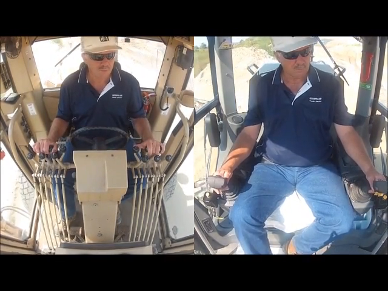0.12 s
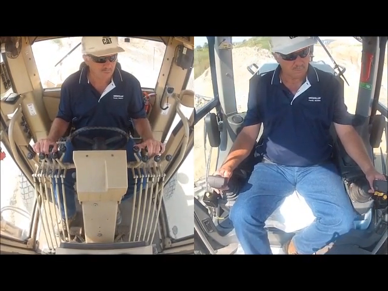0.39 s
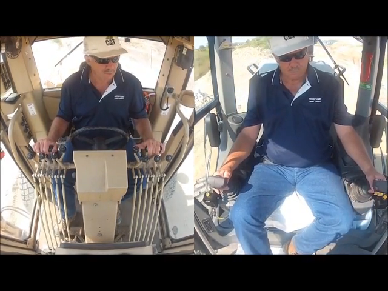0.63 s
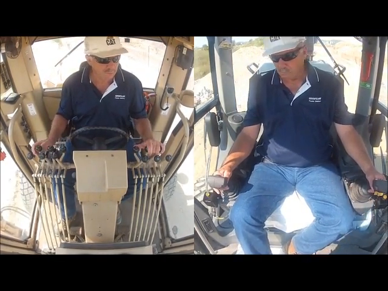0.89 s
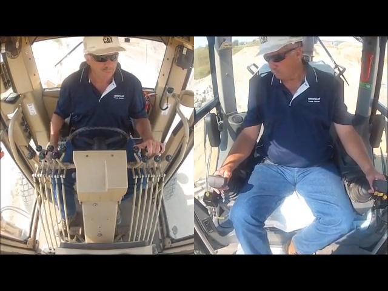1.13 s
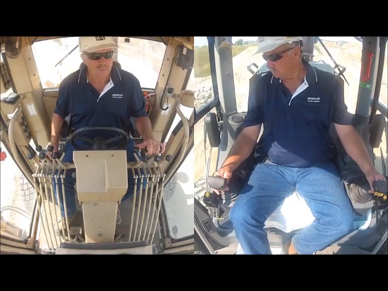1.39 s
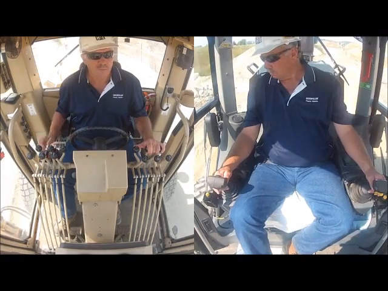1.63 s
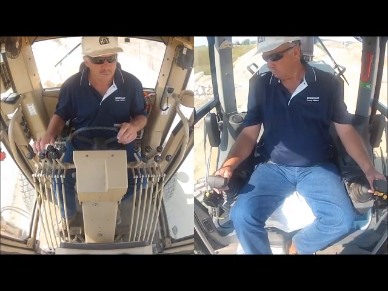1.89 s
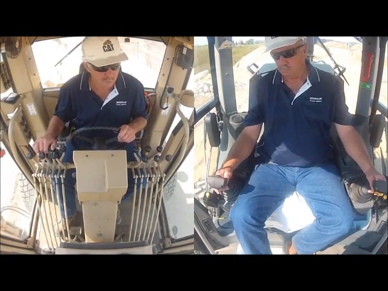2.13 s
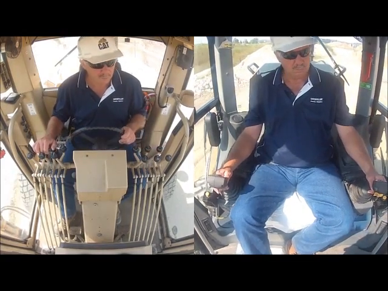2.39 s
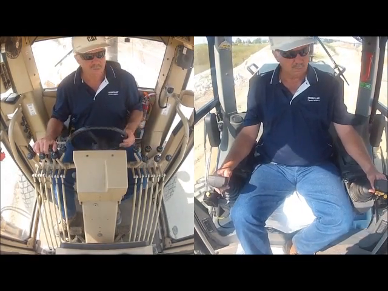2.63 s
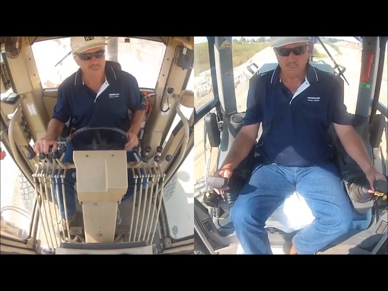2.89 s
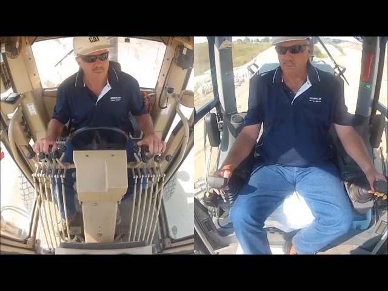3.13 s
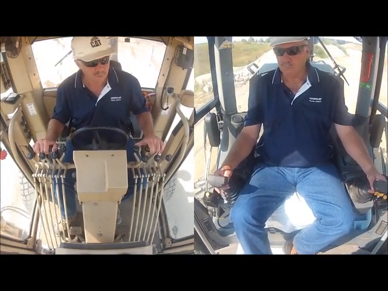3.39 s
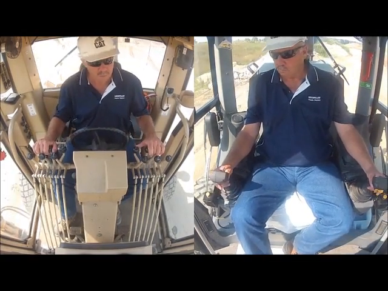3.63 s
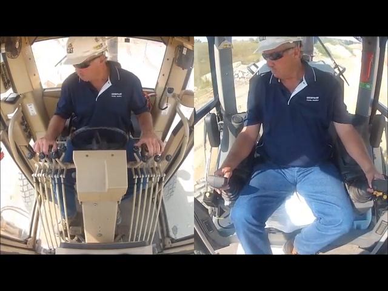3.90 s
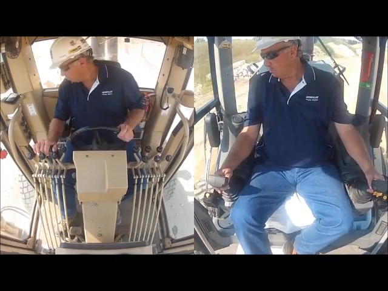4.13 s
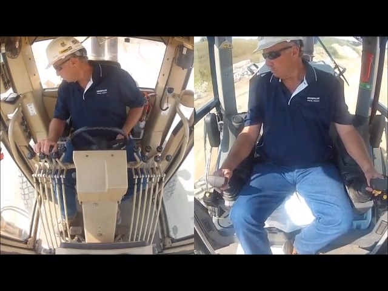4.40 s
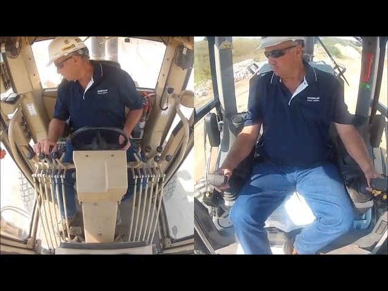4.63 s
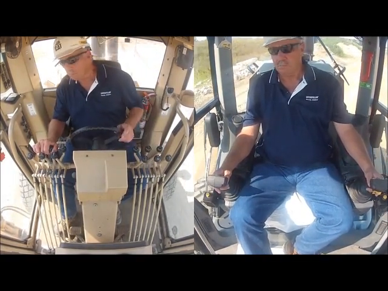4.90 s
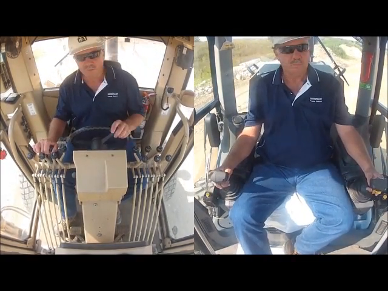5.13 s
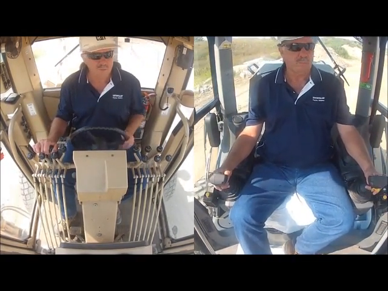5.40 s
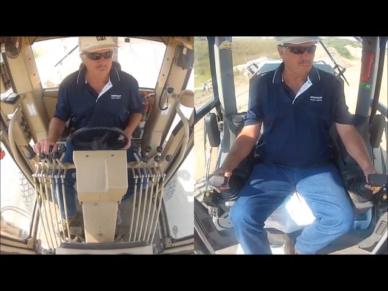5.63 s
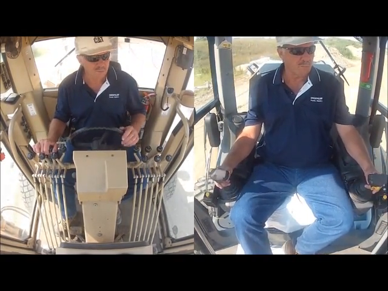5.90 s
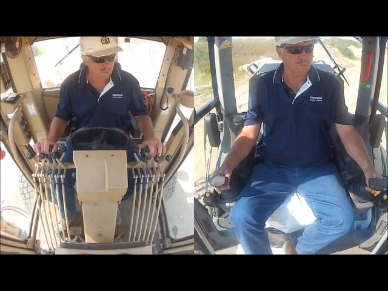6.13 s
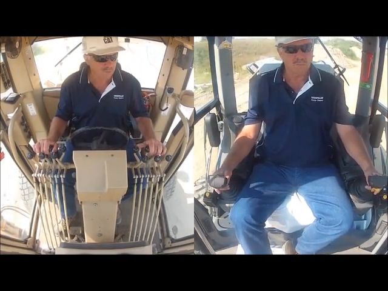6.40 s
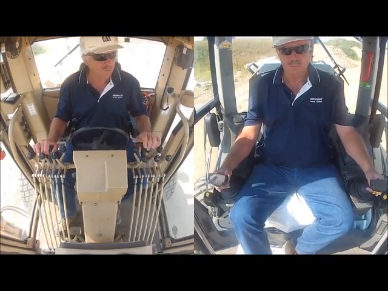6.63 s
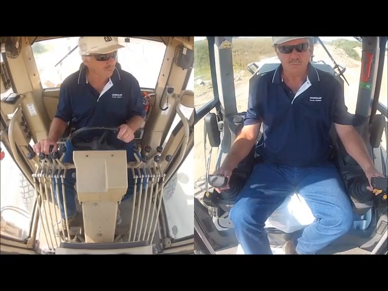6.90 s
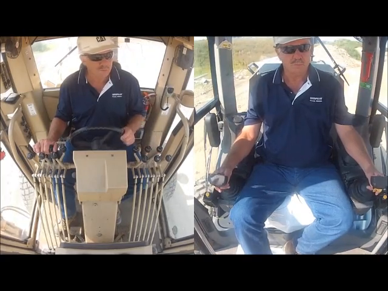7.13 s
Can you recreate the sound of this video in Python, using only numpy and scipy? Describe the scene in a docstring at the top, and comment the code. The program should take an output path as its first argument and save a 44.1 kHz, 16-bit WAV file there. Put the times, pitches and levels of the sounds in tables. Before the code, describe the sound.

Two heavy diesel engines drone low and throb against each other inside machine cabs, with rumble, faint hydraulic whine, bumps and one sharp lever click.

```python
"""Two six-cylinder diesels throb throughout, close enough in speed to beat; the right one sags under load and recovers.
Sines follow their firing and crank orders, and noise stirred by the left engine's firing makes the clatter.
A piston pump on the right engine hums and whines with pressure. The cab booms, thuds, rumbles and jolts over
rough ground; clicks and rattles ring as decaying modes over a restless gear-mesh band. It is all in mono.
A slow sample-and-hold recorder mirrors the mix into the treble."""
import sys
import numpy as np
from scipy import signal
from scipy.fft import rfft, irfft, next_fast_len
from scipy.io import wavfile
from scipy.ndimage import map_coordinates

SR = 44100
rng = np.random.default_rng(int(sys.argv[2]) if len(sys.argv) > 2 else 0)


def gain_from_decibels(decibels):
    """Convert decibel values to linear amplitude factors."""
    exponent = np.asarray(decibels, float) / 20
    return 10 ** exponent


def digitize_waveform(pressure):
    """Quantize a signal to 16-bit integers and store it at the path in sys.argv[1].

    Rows of a 2-D input are taken as channels; values are limited to [-1, 1].
    """
    field = np.atleast_2d(pressure).T
    bounded = np.clip(field, -1, 1)
    quanta = np.round(bounded * 32767).astype(np.int16)
    wavfile.write(sys.argv[1], SR, quanta)


N = 320607

# left engine's firing rate: t/s, f/Hz
LEFT_FIRING = [(0, 108.2), (.6, 107.99), (1.5, 106.98), (2.3, 108.49), (2.8, 107.36), (3.45, 108.05),
               (4.2, 106.75), (4.6, 107.52), (5.1, 106.92), (5.8, 107.63), (6.8, 107.99), (7.27, 107.71)]
# right engine's firing rate and firing tone: t/s, f/Hz, level/dB
RIGHT_FIRING = [(0.0, 111.74, -20.7), (0.6, 111.2, -21.8), (1.45, 111.23, -19.5), (1.7, 108.58, -34.8),
                (2.1, 108.53, -19.4), (2.5, 100.69, -27.6), (2.65, 101.54, -26.9), (2.9, 111.72, -22.2),
                (3.0, 111.93, -22.4), (3.45, 109.41, -20.5), (3.9, 111.44, -19.1), (4.25, 111.48, -20.5),
                (4.55, 112.1, -24.0), (5.2, 111.46, -24.2), (6.4, 111.09, -21.1), (7.0, 111.38, -24.1),
                (7.27, 111.22, -24.3)]
# other crank-locked lines of each engine, before wavering: cycles in two crank turns, level/dB
LEFT_ORDERS = [(7, -40), (9, -34.5), (10, -37.5), (11, -35), (12, -31), (14, -37.5), (15, -42.5), (16, -50),
               (19, -42), (30, -45.5), (34, -43.5)]
RIGHT_ORDERS = [(10, -35), (14, -42.5), (16, -43), (20, -40.5), (27, -47), (29, -43), (32, -45.5),
                (37, -51.5), (39, -43.5), (40, -46), (42, -49.5), (52, -57)]
# where each engine starts in its firing cycle: left/cycles, right/cycles
START_CYCLES = (.071, .734)
# hum of a pump with nine pistons a crank turn: cycles in two crank turns, relative level/dB
PUMP_HUM = [(18, 0), (36, 0)]
# its whine: cycles in two crank turns, relative level/dB, growth/(dB per pressure dB)
PUMP_WHINE = [(54, 12, .5), (72, -4.5, 1), (108, -9, 1)]
# hydraulic valves held open: t/s, length/s, pressure over idle/dB
VALVE_STROKES = [(1.2, 0.22, 2), (2.45, 0.35, 15), (2.82, 0.27, 14.5), (3.517, 0.19, 19), (3.9, 0.23, 16.5),
                 (4.5, 0.31, 13.5), (4.99, .3, 14.5), (5.405, 0.29, 14)]
# spells when the pump hum eases off: t/s, length/s
PUMP_UNLOADED = [(1.58, .85), (2.85, .65), (4.22, 0.21)]
# colour of the combustion clatter: f/Hz, relative level/dB per Hz
CLATTER_COLOUR = [(700, -2), (1100, 5), (1520, -20), (1660, 7.5), (1900, 1), (2200, 5), (2350, -0.5),
                  (2900, 5.5), (3150, 1), (4100, -4)]
# roughness of the ground: t/s, level/dB
GROUND_ROUGHNESS = [(0, 0), (.6, 0), (1.9, 0), (2.4, 1), (2.65, 5), (2.9, 0.5), (3.9, 2), (4.3, 2.5),
                    (4.9, 1.5), (5.2, 2), (5.5, 1.5), (6.0, 1.5), (6.5, 0), (7.27, -3)]
# cab air resonance set going, before wavering: t/s, length/s, f/Hz, level/dB
BOOM_SWELLS = [(-.1, 0.29, 30.8, -20.5), (0.705, .35, 32.98, -19.5), (1.72, 0.39, 32.92, -26),
               (2.22, .12, 33, -20), (2.55, .45, 31.36, -29), (3.77, 1.38, 31.6, -18),
               (5.5, .42, 32.9, -19), (6.05, .3, 32.88, -23)]
# colours of the thuds and the broad rumble: f/Hz, relative level/dB per Hz
THUD_COLOUR = [(12, -40), (18, -2), (24, 11), (34, -4.5), (41, 0), (50, 8), (62, 2.5), (75, -7), (92, -2.5),
               (110, -34)]
RUMBLE_COLOUR = [(85, -6.5), (100, -3.5), (125, 2), (155, -9), (230, -13), (400, -19), (640, -20.5),
                 (710, -21.5), (770, -22), (1000, -31), (1200, -41.5), (1500, -62)]
# bumps in the ground: t/s, level/dB, length of a 20 dB fade/s
JOLTS = [(1.379, -24, 0.095), (2.487, -19, 0.15), (2.692, -20.5, 0.047), (3.032, -24, 0.11),
         (3.384, -25, .08), (3.815, -25, .12), (4.016, -26, .08), (4.249, -25, 0.073), (5.139, -11, 0.045),
         (5.204, -21, 0.041), (5.69, -33, 0.068), (6.062, -22.5, 0.077), (6.184, -24, 0.047),
         (6.6, -25, .08)]
# colour of a jolt's noise: f/Hz, relative level/dB per Hz
FRAME_COLOUR = [(50, -13), (100, -15), (125, -13), (155, -13), (220, -2.5), (450, -8), (900, -22),
                (1500, -45)]
# tones in a jolt: f/Hz, level against its noise/dB
FRAME_MODES = [(123, 3.5), (200, -6), (400, -10.5)]
# lever clicks and rattles: t/s, relative level/dB, ring f/Hz, ring width/Hz, length of a 20 dB fade/s
RATTLES = [(0.931, -34, 1290, 700, .02), (1.293, -29, 2190, 300, 0.041), (1.436, -38, 1298, 700, .02),
           (1.523, -16, 2850, 725, 0.027), (2.482, -35, 2250, 700, .027), (2.686, -35, 1706, 1200, 0.022),
           (2.718, -31, 2300, 1200, 0.021), (3.408, -38, 2095, 500, .02), (3.505, -37, 2900, 1200, 0.048),
           (3.62, -32.5, 3100, 1400, 0.072), (3.65, -41, 3530, 1400, .04),
           (4.067, -29.5, 3292, 2200, 0.029), (4.089, -30.5, 3520, 1500, .028),
           (4.182, -32, 3060, 2200, 0.022), (4.258, -40, 1498, 700, .017), (4.506, -37, 1400, 600, .02),
           (4.68, -40, 1324, 600, .021), (5.147, -38, 1300, 900, .026), (5.817, -34.5, 3195, 2200, 0.03),
           (6.18, -31, 1190, 1000, 0.023)]
# modes of a loose fitting: share of ring f, relative level/dB
FITTING_MODES = [(1, 0), (.77, -8), (1.22, -8), (.5, -15)]
# recorder's low-pass before sampling: f/Hz, level/dB
GUARD_FILTER = [(3100, 0), (3500, -5.5), (3900, -10.5), (4100, -38), (5000, -60)]
# recorder's treble shaping after the hold: f/Hz, level/dB
TREBLE_SHAPE = [(4000, 0.5), (9000, 1), (12000, 1.5), (14000, -0.5), (15000, -12)]
# recorder's band limit after the hold: f/Hz, level/dB
BAND_EDGE = [(15290, 0), (15340, -19), (15700, -22), (15760, -80)]

GOVERNED_HZ = 111.5  # set firing rate of the right engine
VALVE_S = 0.071  # valve travel


def along(points, hz):
    """Reads (f/Hz, value) points on a log frequency axis."""
    f, v = np.transpose(points)
    return np.interp(np.log(hz + 1), np.log(f + 1), v)


def curves(rows):
    """One value per sample for each column after the time."""
    s, *cols = np.transpose(rows)
    return [np.interp(np.arange(N) / SR, s, c) for c in cols]


def wobble(rate):
    """A smooth random curve, rate knots a second."""
    knots = rng.standard_normal(int(N * rate / SR) + 4)
    return map_coordinates(knots, [np.arange(N) * rate / SR])


def filtered(x, response):
    """Shapes x by a response given as a function of frequency."""
    m = next_fast_len(N + 8192)
    return irfft(rfft(x, m) * response(np.fft.rfftfreq(m, 1 / SR)), m)[:N]


def noise(colour):
    """Coloured noise of rms 1."""
    x = filtered(rng.standard_normal(N), lambda hz: gain_from_decibels(along(colour, hz)))
    return x / x.std()


def tone(cycles):
    """A sine of rms 1 that follows a count of cycles."""
    return np.sqrt(2) * np.sin(2 * np.pi * cycles)


def swell(t, length, rise):
    """Quick rise, then a fade of 20 dB over the length; silent before zero."""
    t = np.maximum(t, 0)
    return (1 - np.exp(-(t / rise) ** 2)) * gain_from_decibels(-20 * t / length)


def held(start, length, edge):
    """Near 1 from start for the length, with smooth edges."""
    t = np.arange(N) / SR - start
    return (np.tanh(2 * t / edge) - np.tanh(2 * (t - length) / edge)) / 2


def orders(firings, table):
    """Lines tied to the crank, six firings in two turns; each wavers in level and timing on its own."""
    lines = 0
    for order, db in table:
        drift = rng.random() + 0.07 * wobble(10)  # cycles
        lines = lines + gain_from_decibels(db + 1.8 * wobble(9)) * tone(order / 6 * firings + drift)
    return lines


def engines(left, right, left_hz, right_hz, right_db):
    """Cylinders firing at nearly equal rates beat; crank orders follow each engine's speed."""
    usual_hz, usual_db, db_per_hz = 107.6, -20.7, 3.6  # left engine: louder as load slows it
    left_tone = gain_from_decibels(usual_db + db_per_hz * (usual_hz - left_hz)) * tone(left)
    right_tone = gain_from_decibels(right_db) * tone(right)
    # pulses sharpen as load drags the right engine down: its second harmonic grows 2 dB per Hz
    lugging = gain_from_decibels(-45.0 + 2.0 * (GOVERNED_HZ - right_hz)) * tone(2 * right)
    lines = orders(left, LEFT_ORDERS) + orders(right, RIGHT_ORDERS)
    return left_tone + right_tone + lugging + lines


def clatter(left):
    """Combustion knock: coloured noise stirred by each left-engine firing, stronger on rough ground."""
    even_ground_db, db_per_rough_db = -44.5, 0.47
    (rough_db,) = curves(GROUND_ROUGHNESS)
    stirred = gain_from_decibels(0.87 * tone(left) + 0.53 * wobble(12) + 1.4 * wobble(40))
    return gain_from_decibels(even_ground_db + db_per_rough_db * rough_db) * stirred * noise(CLATTER_COLOUR)


def pump(right, right_hz):
    """Piston pulses turn with the right engine; valve pressure lifts them, and sag weakens the whine."""
    hum_db, hum_db_per_pressure_db, eased_by_db = -37, 0.22, -8
    whine_db, sag_db_per_hz = -62.5, 1.5
    pressure_db = sum(db * held(s, length, VALVE_S) for s, length, db in VALVE_STROKES)
    eased_db = eased_by_db * sum(held(s, length, VALVE_S) for s, length in PUMP_UNLOADED)
    hum_level = gain_from_decibels(hum_db + eased_db + hum_db_per_pressure_db * pressure_db + 0.83 * wobble(2.95))
    hum = hum_level * orders(right, PUMP_HUM)
    drive_db = pressure_db - sag_db_per_hz * (GOVERNED_HZ - right_hz)
    whine = sum(gain_from_decibels(grows * drive_db) * orders(right, [(order, db)]) for order, db, grows in PUMP_WHINE)
    return hum + gain_from_decibels(whine_db) * whine


def powertrain():
    """Both engines, the clatter and the pump, locked to the same running count of firings."""
    (left_hz,), (right_hz, right_db) = curves(LEFT_FIRING), curves(RIGHT_FIRING)
    left = START_CYCLES[0] + np.cumsum(left_hz) / SR
    right = START_CYCLES[1] + np.cumsum(right_hz) / SR
    return engines(left, right, left_hz, right_hz, right_db) + clatter(left) + pump(right, right_hz)


def boom():
    """The cab's air resonance swells in separate spells over a faint, wavering drone."""
    t, edge_s = np.arange(N) / SR, 0.067  # time to build and to die
    swells = sum(gain_from_decibels(db) * held(s, length, edge_s) * tone(hz * t + rng.random())
                 for s, length, hz, db in BOOM_SWELLS)
    drone = gain_from_decibels(-30.5 + 1.6 * wobble(6)) * tone(32.38 * t + 0.14 * wobble(5))
    return gain_from_decibels(1.24 * wobble(14)) * swells + drone


def ground():
    """Rough ground shakes the cab with low thuds and a broad rumble, both noise that follows roughness."""
    thud_db, rumble_db, thud_db_per_rough_db = -25.5, -21, 0.86  # levels on even ground
    (rough_db,) = curves(GROUND_ROUGHNESS)
    thuds = gain_from_decibels(thud_db + thud_db_per_rough_db * rough_db) * noise(THUD_COLOUR)
    rumble = gain_from_decibels(rumble_db + rough_db + 0.54 * wobble(9)) * noise(RUMBLE_COLOUR)
    return thuds + rumble


def jolts():
    """Single bumps come through the frame as short swells of coloured noise and wavering tones."""
    t = np.arange(N) / SR
    bumps = sum(gain_from_decibels(db) * swell(t - s, length, rise=0.0069) for s, db, length in JOLTS)
    modes = sum(gain_from_decibels(db) * tone(hz * t + 0.35 * wobble(6)) for hz, db in FRAME_MODES)
    return bumps * (noise(FRAME_COLOUR) + modes)


def rattles():
    """Each is a dense, lumpy chatter of small contacts that rings a loose fitting."""
    out, t = np.zeros(N + SR), np.arange(SR // 8) / SR
    lumps = gain_from_decibels(6 * np.cos(2 * np.pi * (t - 0.002) / 0.0042))  # the part bounces every 4.2 ms
    for s, db, hz, width, length in RATTLES:
        force = lumps * swell(t, length, rise=0.0022)
        decay = t * np.exp(-np.pi * width * t)
        ring = sum(gain_from_decibels(level) * decay * np.sin(2 * np.pi * share * hz * t) for share, level in FITTING_MODES)
        contacts = force * rng.choice([-1, 1], len(t))
        burst = signal.fftconvolve(contacts, ring)[:len(t)]
        burst *= np.linalg.norm(force) / np.linalg.norm(burst)  # as much energy as the force
        out[round(s * SR):][:len(t)] += gain_from_decibels(db) * burst
    return out[:N]


def gearbox():
    """Meshing teeth: two randomly swaying tones a quarter cycle apart make a narrow, restless band."""
    mesh_hz, wander_hz = 692, 3.5
    even_ground_db, db_per_rough_db = -33.5, 0.94
    (rough_db,) = curves(GROUND_ROUGHNESS)
    mesh = np.cumsum(mesh_hz + wander_hz * wobble(2)) / SR
    band = (wobble(44) * tone(mesh) + wobble(44) * tone(mesh + 1 / 4)) / np.sqrt(2)
    return gain_from_decibels(even_ground_db + db_per_rough_db * rough_db) * band


def scene():
    """Everything heard in the two cabs, as one channel."""
    return (powertrain() + boom() + ground() + jolts() + rattles() + gearbox())[None]


def band_limit(x):
    """A steep low-pass at the top of the band."""
    return signal.sosfilt(signal.butter(12, 15610, fs=SR, output="sos"), x)


def record(dry):
    """Slow samples held in steps mirror the spectrum around the sampling rate; peaks clip."""
    hold_hz = 8000
    guarded = filtered(dry[0], lambda hz: gain_from_decibels(along(GUARD_FILTER, hz)))
    # every second sample at twice the rate, so what the guard leaves above half the rate folds down
    samples = signal.resample_poly(guarded, 2 * hold_hz, SR)[::2]
    steps = signal.resample_poly(np.repeat(samples, 6), SR, 6 * hold_hz)[:N]
    shaped = filtered(steps, lambda hz: gain_from_decibels(along(TREBLE_SHAPE, hz) + along(BAND_EDGE, hz)))
    clipped = np.clip(shaped, -0.497, 0.497)
    return band_limit(clipped[None])


dry = scene()
out = record(dry)
digitize_waveform(out)
```